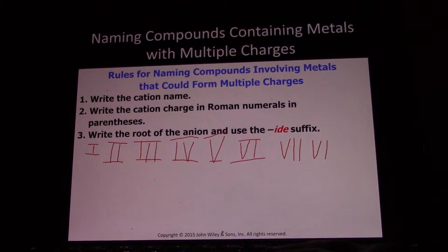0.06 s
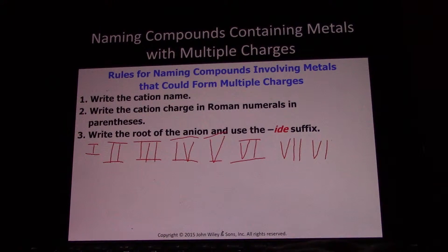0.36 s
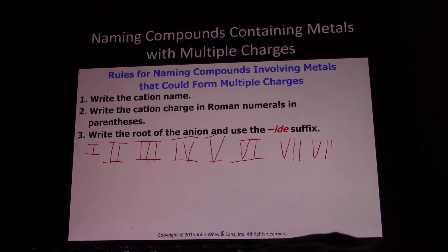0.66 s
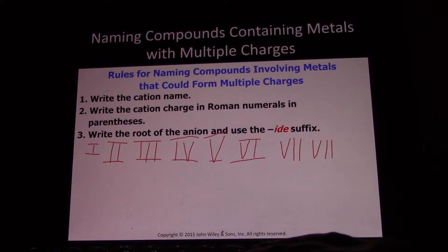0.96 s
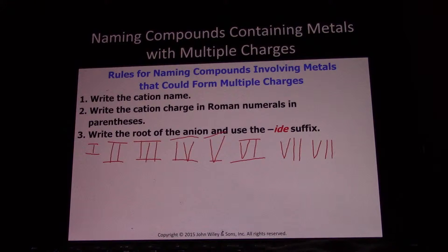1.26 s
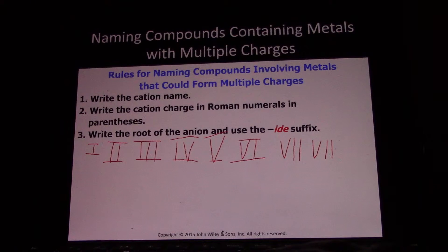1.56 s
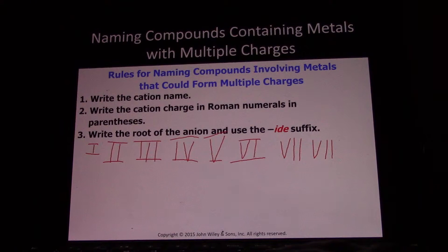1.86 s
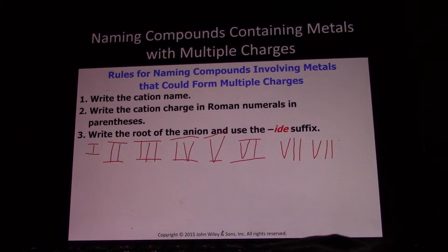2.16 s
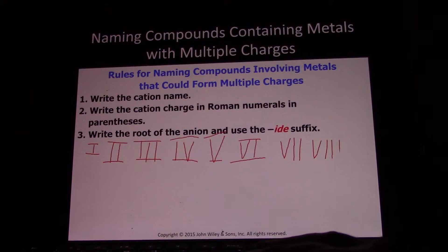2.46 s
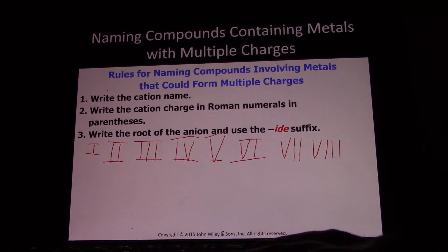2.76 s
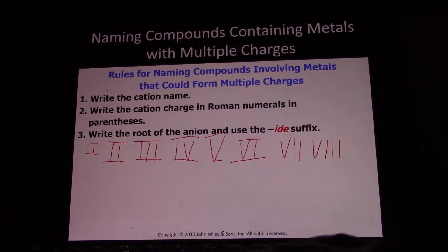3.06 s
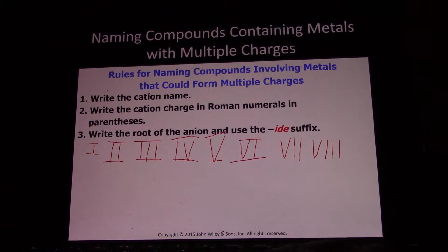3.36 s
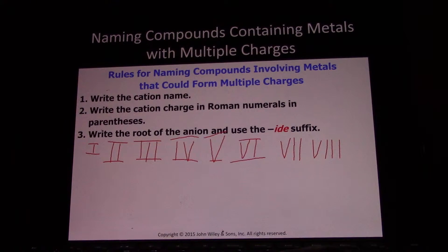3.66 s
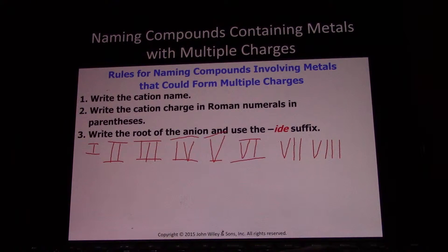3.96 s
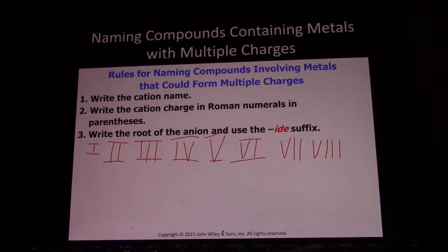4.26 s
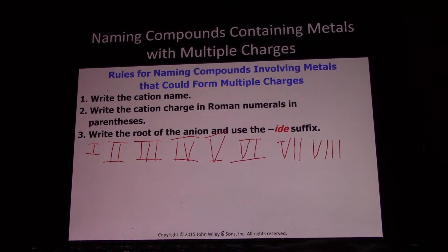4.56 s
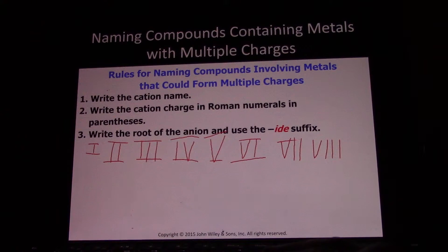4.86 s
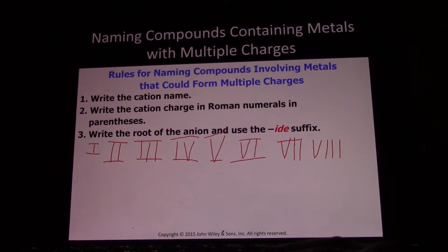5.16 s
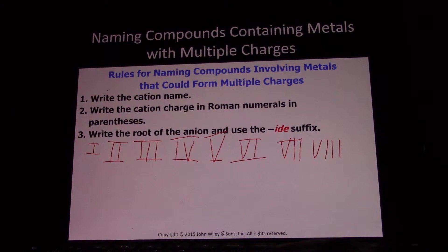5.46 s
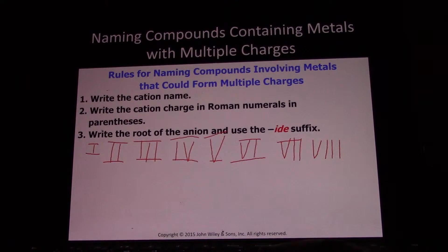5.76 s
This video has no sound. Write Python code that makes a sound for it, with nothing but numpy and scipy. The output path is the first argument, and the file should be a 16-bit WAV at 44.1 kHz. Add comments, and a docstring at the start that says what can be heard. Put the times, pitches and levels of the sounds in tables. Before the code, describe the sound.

Fans hiss softly and steadily throughout in a small, dry classroom. Close to the microphone, almost straight ahead, a plastic stylus meets a hard writing tablet at about 0.4 seconds with a sharp click and a short, hollow knock. The tip stutters faintly around 0.6 seconds, then lifts with a duller, quieter knock at 0.9. A hand very faintly brushes the surface around 1.3 and 1.5 seconds. The stylus clicks down again at 1.9 and lifts at 2.8, with no stutter in between. At 3.1 the hand brushes again and nudges the tablet with a soft thud. The third click comes at 4.1 seconds, followed by a low, soft stutter of the tip until about 4.5. Another gentle nudge follows at 4.6, and the stylus lifts with a last dull knock at 5.3, leaving only the fans.

```python
"""Fans hiss steadily in a small, dry classroom. A stylus meets a hard writing tablet close by: the
tip snaps in and the impact rings the slab. The tip stutters softly by stick-slip friction, then
lifts and springs back with a duller knock. A hand brushes the surface. A second stroke follows
without stutter, and the hand brushes again and nudges the tablet. The third and longest stroke
stutters most, and the tablet is nudged once more before the last lift."""
import sys
import numpy as np
from scipy import signal
from scipy.fft import rfft, irfft
from scipy.io import wavfile

SR = 44100
rng = np.random.default_rng(int(sys.argv[2]) if len(sys.argv) > 2 else 0)


def wrap_up_sound(samples):
    """Save the sound to the file named by the first command line argument, as 16-bit audio."""
    columns = np.atleast_2d(samples).T
    # keep every value between -1 and 1, then stretch to whole-number steps
    tamed = np.clip(columns, -1, 1)
    steps = np.round(tamed * 32767).astype(np.int16)
    wavfile.write(sys.argv[1], SR, steps)


N = 261072
TIME_S = np.arange(N) / SR
RING_S = np.arange(SR // 3) / SR  # time since a blow
PAN = np.array([[.5], [-.5]])  # splits a level difference between left and right


def gain(db):
    """Amplitude ratio of a level in decibels."""
    return 10 ** (np.asarray(db) / 20)


def curve_db(spectrum, size):
    """Interpolation of (frequency_hz, level_db) points over log frequency, one value a bin."""
    hz, db = np.transpose(spectrum)
    bins_hz = np.arange(size // 2 + 1) * SR / size
    return np.interp(np.log(bins_hz + 1), np.log(hz), db)


def colour(x, spectrum):
    """Filtering as multiplication in the frequency domain."""
    size = x.shape[-1]
    return irfft(rfft(x) * gain(curve_db(spectrum, size)), size)


def impulse(spectrum, size=512):
    """Minimum phase: the shortest causal click with a given spectrum."""
    cepstrum = irfft(np.log(gain(curve_db(spectrum, size))))
    cepstrum[1:size // 2] *= 2
    cepstrum[size // 2 + 1:] = 0
    return irfft(np.exp(rfft(cepstrum)))


def decay(t60_s):
    """Exponential damping: a fall of 60 dB in t60_s."""
    return np.exp(-np.log(1000) * RING_S / t60_s)


def ring(modes):
    """Free vibration as a sum of damped modes; neighbours swing in opposite directions."""
    return sum((-1) ** k * gain(db) * decay(t60_s) * np.sin(2 * np.pi * hz * RING_S)
               for k, (hz, t60_s, db) in enumerate(modes))


def noise_burst(spectrum, t60_s):
    """Dense random arrivals merge into decaying, coloured noise."""
    noise = rng.standard_normal(len(RING_S)) * decay(t60_s)
    return np.convolve(noise / np.linalg.norm(noise), impulse(spectrum))


def add(out, start_s, sound):
    """Superposition: a sound joins the mix at start_s."""
    i = int(round(start_s * SR))
    out[i:i + len(sound)] += sound[:len(out) - i]


# air noise of the fans: frequency_hz, level_db
AIR_SPECTRUM = [(15, -49.5), (25, -8.5), (48, -17.5), (69, -7), (204, -2), (260, 0), (289, -1.5), (331, -1),
                (703, -5.5), (1170, -11.5), (1340, -12), (1530, -12.5), (1660, -13.5), (6210, -20.5),
                (15500, -32.5)]
# its side signal relative to its mid signal: frequency_hz, gain_db
AIR_WIDTH = [(60, -7.5), (110, -5.5), (200, -5.5), (380, -5), (700, -4.5), (1290, -4), (2380, -6),
             (4400, -8.5), (8120, -10.5), (15000, -15)]
# resonances of the fan housing: centre_hz, width_hz, peak_db
HOUSING_PEAKS = [(352, 160, 0.5), (900, 130, 1), (1331, 109, 7.5), (1450, 106, 3), (1533, 88, 7),
                 (2930, 560, 1)]
# slow drift of those resonances: time_s, gain_db
HOUSING_DRIFT = [(0, 1.5), (1.4, -1.5), (2.2, 0.5), (3.2, -1), (4.05, 1.5), (4.2, -2.5), (5.2, -4),
                 (5.4, 1)]


def fans(level_db=-61.67, flutter_db=2.5, flutter_per_s=25, housing_pan_db=-1.5):
    """Forced resonance: steady air noise drives the housing, which wavers a little to the right."""
    mid, side, flow = colour(rng.standard_normal((3, N)), AIR_SPECTRUM)
    side = colour(side, AIR_WIDTH)
    hz = np.arange(N // 2 + 1) * SR / N
    peaks_db = sum(db / (1 + (2 * (hz - centre) / width) ** 2) for centre, width, db in HOUSING_PEAKS)
    excess_power = np.maximum(gain(peaks_db) ** 2 - 1, 0)
    housing = irfft(rfft(flow) * np.sqrt(excess_power), N)
    drift_db = np.interp(TIME_S, *np.transpose(HOUSING_DRIFT))
    flutter = np.interp(TIME_S * flutter_per_s, np.arange(N), rng.standard_normal(N))
    housing *= gain(drift_db + flutter_db * flutter)
    sound = np.array([mid + side, mid - side]) + housing * gain(housing_pan_db * PAN)
    return gain(level_db) * sound / np.std(mid)


# modes of the tablet on its desk: pitch_hz, t60_s, press_db, release_db
SLAB_MODES = [(146.7, 0.11, -46, -55), (269.4, 0.044, -20.5, -24), (280.3, 0.064, -24.5, -31.5),
              (315.2, 0.15, -40, -43.5), (444, 0.067, -34, -48.5), (510.7, 0.19, -41, -48.5),
              (659, 0.13, -40, -52.5), (810, 0.071, -37.5, -48.5), (822.7, 0.018, -21, -40),
              (1054, 0.1, -52.5, -71), (1140, 0.064, -38.5, -55.5), (1334, 0.036, -31.5, -47.5),
              (1602, 0.031, -31.5, -53.5)]


def slab_knocks(shell_hz=565, swell_s=0.0021):
    """Modal response to press and to release; the hollow shell swells for a cycle, then dies away."""
    hz, t60_s, press_db, release_db = np.transpose(SLAB_MODES)
    age = RING_S / swell_s
    shell = age * np.exp(1 - age) * np.sin(2 * np.pi * shell_hz * RING_S)
    press = ring(zip(hz, t60_s, press_db)) + gain(-15) * shell
    release = ring(zip(hz, t60_s, release_db)) + gain(-27.5) * shell
    return press, release


# modes of the plastic pen barrel: pitch_hz, t60_s, level_db
BARREL_MODES = [(1785, 0.13, -52.5), (2065, 0.016, -30.5), (2350, 0.044, -53.5), (2630, 0.077, -48),
                (3000, 0.047, -53), (3500, 0.027, -38.5), (4060, 0.079, -56), (4260, 0.018, -35.5),
                (4905, 0.0088, -26), (5770, 0.016, -52), (6700, 0.028, -80), (8240, 0.018, -47)]
# brightness of the rattle relative to the click: frequency_hz, gain_db
RATTLE_TILT = [(1000, -2.5), (3000, -0.5), (6000, 5), (10000, 6), (15000, -5)]


def snap(spectrum, touch_db=-8, travel_s=0.0005, seat_db=-2, barrel_db=0, rattle_db=-6,
         rattle_t60_s=0.013):
    """Double impact: the tip touches, then seats and sets the barrel ringing and rattling."""
    out = np.zeros(len(RING_S))
    click = impulse(spectrum)
    rattle = np.convolve(noise_burst(RATTLE_TILT, rattle_t60_s), click)
    add(out, 0, gain(touch_db) * click)
    add(out, travel_s, gain(seat_db) * click)
    add(out, travel_s, gain(barrel_db) * ring(BARREL_MODES))
    add(out, travel_s, gain(rattle_db) * rattle)
    return out


# click of the tip going in: frequency_hz, level_db
PRESS_CLICK = [(200, -7.5), (900, -13), (2000, -0.5), (3200, 7), (4500, -4), (5500, -7.5), (6300, -4),
               (7500, -10), (10000, -23), (15000, -30)]
# click of the tip springing back: frequency_hz, level_db
RELEASE_CLICK = [(300, -17), (850, 3.5), (1700, -7), (2350, 5), (3700, -5.5), (5100, -15), (6500, -1.5),
                 (8500, -11), (11000, -20.5), (15000, -26)]
# strokes of the pen: down_s, up_s, force_db, release_snap_db, ping_hz
PEN_STROKES = [(0.3783, 0.9100, 1.2, -21.5, 2360), (1.9304, 2.8089, 0.5, -24.5, 3240),
               (4.0923, 5.321, 0, -21.5, 3850)]


def pen(snap_db=-1.27, snap_db_per_db=1.5, ping_db=-53.5, ping_t60_s=0.025):
    """Impact excitation: the snap grows faster with force than the knock, so firmer is brighter."""
    out = np.zeros(N)
    press, release = slab_knocks()
    for down_s, up_s, force_db, release_snap_db, ping_hz in PEN_STROKES:
        snap_in = gain(snap_db + snap_db_per_db * force_db) * snap(PRESS_CLICK)
        add(out, down_s, gain(force_db) * press + snap_in)
        # the unloaded tip is loose, so it rattles more and pings
        snap_out = snap(RELEASE_CLICK, touch_db=-24, travel_s=0.00036, seat_db=2, barrel_db=-3,
                        rattle_db=-5.5, rattle_t60_s=0.032)
        ping = ring([(ping_hz, ping_t60_s, ping_db)])
        add(out, up_s, gain(force_db) * release + gain(release_snap_db) * snap_out + ping)
    return out


def radiate(x, cutoff_hz=116):
    """Radiation efficiency: a small slab moves too little air to sound deep bass."""
    return signal.sosfilt(signal.butter(3, cutoff_hz, "high", fs=SR, output="sos"), x)


# echoes from nearby surfaces, ceiling and walls: delay_s, mirrored_db, scattered_db
REFLECTIONS = [(.00655, -14, -19), (.0345, -55, -29), (.0397, -26, -31.5), (.0456, -33, -40),
               (.0558, -32, -49)]
# surfaces mirror the bass and scatter the treble: frequency_hz, mirrored_db, scattered_db
SURFACE_RESPONSE = [(300, 1.5, -9), (555, -0.5, -12), (1000, 1, -5), (2500, -2.5, -4), (7000, -4.5, -3),
                    (13000, -2, -3)]
# diffuse sound of the room: frequency_hz, level_db
REVERB_SPECTRUM = [(100, 18), (300, 6.5), (600, -7), (1200, -3), (3000, 7.5), (6000, 2.5), (12000, 5)]


def classroom(x, wet_db=-27, t60_s=0.24, gap_s=0.009, side_db=-6, scatter_t60_s=0.023):
    """Reverberation: a few echoes, their treble scattered by furniture, and a short diffuse tail."""
    mid, side = np.zeros((2, len(RING_S)))
    hz, mirrored_db, scattered_db = np.transpose(SURFACE_RESPONSE)
    for delay_s, mirror_db, scatter_db in REFLECTIONS:
        add(mid, delay_s, gain(mirror_db) * impulse(np.c_[hz, mirrored_db]))
        add(mid, delay_s, gain(scatter_db) * noise_burst(np.c_[hz, scattered_db], scatter_t60_s))
    add(mid, gap_s, gain(wet_db) * noise_burst(REVERB_SPECTRUM, t60_s))
    add(side, gap_s, gain(wet_db + side_db) * noise_burst(REVERB_SPECTRUM, t60_s))
    response = np.array([mid + side, mid - side])
    return x + signal.fftconvolve(x[None], response, axes=1)[:, :N]


def push(modes, rise_s=0.00094):
    """Soft contact: the force builds gradually, so the modes start without a click."""
    return (1 - np.exp(-RING_S / rise_s)) * ring(modes)


def rub(moves, spectrum):
    """Sliding friction: noise swells and fades with each short move."""
    contact = sum(gain(db) * np.exp(-((TIME_S - centre_s) / half_length_s) ** 2)
                  for centre_s, half_length_s, db in moves)
    noise = colour(rng.standard_normal(N), spectrum)
    return contact * noise / np.sqrt(np.mean(noise ** 2))


# slips of the tip during a stroke: start_s, level_db
TIP_SLIPS = [(0.578, -51.5), (0.625, -58), (4.198, -45.5), (4.25, -48), (4.285, -42), (4.334, -48),
             (4.405, -43), (4.453, -50)]
# soft friction ringing in the tablet: frequency_hz, level_db
DRAG_SPECTRUM = [(200, -35), (320, -10), (365, 0), (410, -12.5), (600, -32), (2000, -60)]


def stutter(pitch_hz=365, t60_s=0.067, drag_db=-17, drag_lag_s=0.004, drag_half_s=0.028):
    """Stick-slip friction: each slip wakes one low mode, and the tip drags faintly around it."""
    out = np.zeros(N)
    for start_s, db in TIP_SLIPS:
        add(out, start_s, push([(pitch_hz, t60_s, db)]))
    drags = [(start_s + drag_lag_s, drag_half_s, db + drag_db) for start_s, db in TIP_SLIPS]
    return out + rub(drags, DRAG_SPECTRUM)


# moves of the hand over the surface: centre_s, half_length_s, level_db
HAND_MOVES = [(1.257, 0.057, -66), (1.466, 0.011, -60.5), (3.084, 0.029, -60.5)]
# skin sliding on the tablet: frequency_hz, level_db
SKIN_SPECTRUM = [(150, 5), (600, 7.5), (1200, 4), (3200, -2), (5000, -13), (12000, -28)]


def brushes():
    """Friction noise: skin brushes the surface between strokes."""
    return rub(HAND_MOVES, SKIN_SPECTRUM)


# the hand nudges the tablet: start_s, level_db
HAND_NUDGES = [(3.097, -39), (4.643, -42.5)]
# dull thud of a nudge: pitch_hz, t60_s, level_db
THUD_MODES = [(198, 0.015, 1), (565, 0.025, -5)]


def nudges():
    """Low-frequency excitation: a slow, soft push of the hand wakes only low modes."""
    out = np.zeros(N)
    for start_s, db in HAND_NUDGES:
        add(out, start_s, gain(db) * push(THUD_MODES))
    return out


def scene(tablet_pan_db=0.74, fans_pan_db=1.0):
    """Level difference sets direction: the tablet almost ahead, the air noise slightly left."""
    tablet = radiate(pen() + stutter() + brushes() + nudges())
    return classroom(tablet) * gain(tablet_pan_db * PAN) + fans() * gain(fans_pan_db * PAN)


def record(dry, cutoff_hz=15650):
    """Band limiting: the microphone cuts the highest treble."""
    return signal.sosfilt(signal.ellip(10, .1, 70, cutoff_hz, fs=SR, output="sos"), dry)


dry = scene()
out = record(dry)
wrap_up_sound(out)
```